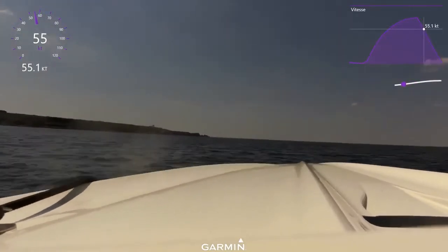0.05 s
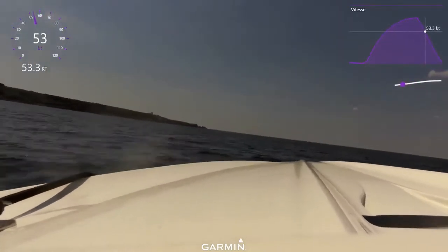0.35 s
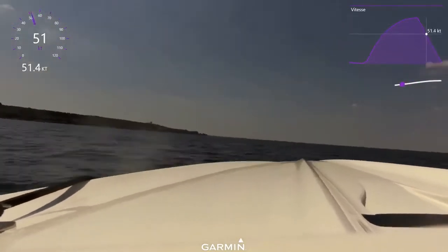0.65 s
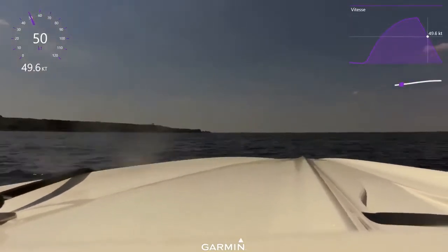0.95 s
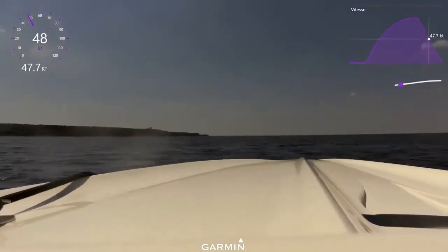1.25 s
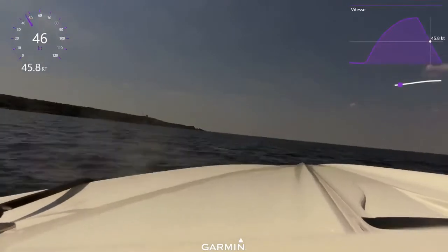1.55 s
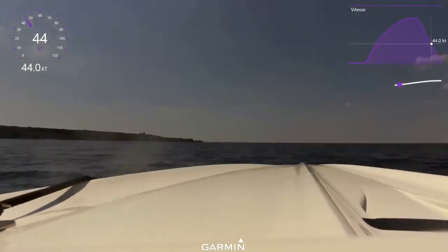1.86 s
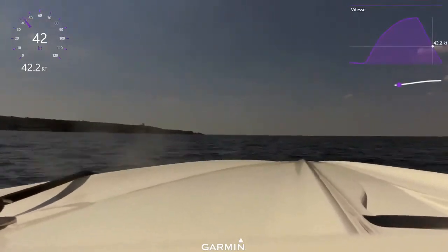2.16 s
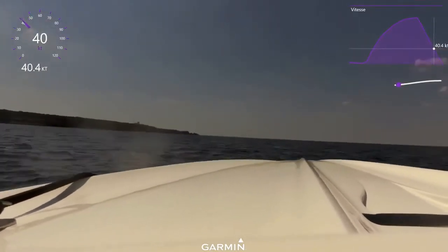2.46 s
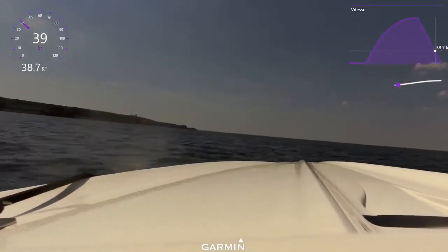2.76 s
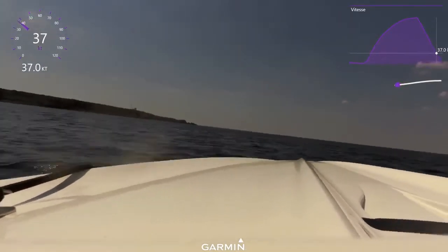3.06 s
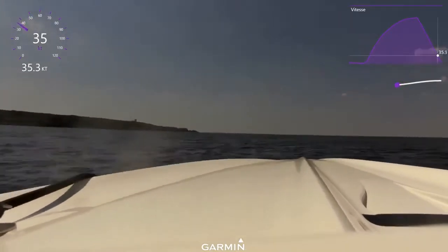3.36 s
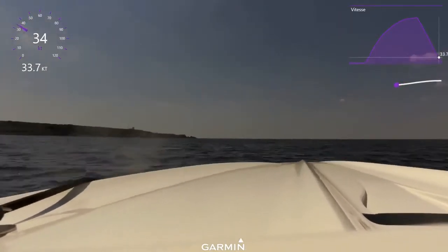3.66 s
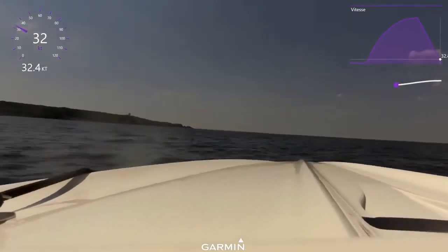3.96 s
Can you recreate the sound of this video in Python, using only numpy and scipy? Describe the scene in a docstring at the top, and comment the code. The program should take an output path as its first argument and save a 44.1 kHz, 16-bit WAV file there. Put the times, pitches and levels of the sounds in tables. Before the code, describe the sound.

Low, gusting wind hits a camera's microphone aboard a speedboat, first with a loud, fast chatter from the mount, then with scattered sharp knocks. Drops tick close by, while water slaps and faintly hisses along the hull.

```python
"""A camera mount chatters and knocks in the headwind, heard from the small camera's own microphone
on the deck of a speedboat slowing from a fast run. For the first second the mount buzzes hard; as the
wind eases this breaks up into single knocks that briefly choke the microphone. Wind roars and buffets
right at the port and spray ticks on the housing. Farther off, water slaps and hisses along the hull,
over a deep rumble."""
import sys
import numpy as np
from scipy import signal
from scipy.fft import rfft, irfft
from scipy.io import wavfile
from scipy.ndimage import uniform_filter1d

SR = 44100
rng = np.random.default_rng(int(sys.argv[2]) if len(sys.argv) > 2 else 0)


def int16_out(signal):
    """Quantize to a 16-bit WAV file."""
    q = np.round(np.clip(np.atleast_2d(signal).T, -1, 1) * 32767)
    wavfile.write(sys.argv[1], SR, q.astype(np.int16))


N = 176400
T = np.arange(N) / SR
KNOCK_MS = 0.74  # width of the pulse from a knock or a drop

# modes of the camera housing: pitch_hz, level_db, t60_ms
HOUSING_MODES = [(2870, 1.5, 7), (3952, 7, 5.4), (4680, 2, 3.26), (1170, -5, 6.4), (8500, -23, 3.0)]


def mount_chatter(rate_hz=99.2, end_s=1.033, jitter_ms=0.33, choke_db=22.5):
    """The mount pushes, sags, rebounds and recovers; returns pressure, scrape envelope and wind gain."""
    # strength of the chatter: time_s, level_db
    strength = [(0, -2), (.3, -2.5), (.6, -1), (.76, -2), (.8, -4), (.86, -3), (.91, -2.5), (.985, -2.5),
                (1.03, -9)]
    # push to rebound, long in a steady blast and short when the chatter sputters: time_s, delay_ms
    rebound_delay = [(0, 1.7), (.12, 2.8), (.145, 1.1), (.2, 2.1), (.55, 2.82), (.72, 2.62), (.96, 2.07),
                     (.985, 1.26), (1.03, 2.5)]
    # scrape after each cycle, relative to its strength: time_s, level_db
    scrape_level = [(0, -22), (.09, -8.5), (.13, -26), (.24, -2.5), (.28, -22), (.39, -19), (.44, -17),
                    (.52, -11.5), (.67, -20), (.78, -14), (.88, -16), (.99, -34), (1.03, 3)]
    # spectrum of the grit in the rebound: frequency_hz, level_db
    grit_colour = [(500, -11.5), (1500, 2), (4000, -3.5), (5500, -13), (8000, -10), (16000, -17.5)]
    push_ms, rebound_ms, release_ms, recover_ms = 0.87, 1, 0.47, 6.6
    bounce_share, rattle_share = 0.37, 0.28
    out, scrape, load = np.zeros((3, N))
    starts = np.arange(.0007, end_s, 1 / rate_hz)
    scatter = np.clip(rng.standard_normal((128, 10)), -1.8, 1.8)
    luck = rng.random((128, 2))
    grit = noise(grit_colour)
    for s, chance, (rattle_luck, bounce_luck) in zip(starts, scatter, luck):
        near, ms = around(s)
        ms = ms - jitter_ms * chance[0]
        gain = undb(curve(strength, s))
        back_ms = max(curve(rebound_delay, s) + 0.53 * chance[1], push_ms)
        free_ms = back_ms + rebound_ms
        push = shove(ms, push_ms, rise_ms=0.12, fall_ms=release_ms)
        sag = undb(-16.5) * shove(ms - push_ms, free_ms - push_ms, release_ms, release_ms)
        rebound = shove(ms - back_ms, rebound_ms, rise_ms=0.53 * np.exp(chance[4] / 2), fall_ms=release_ms)
        swing = push - sag - rebound
        age_ms = np.maximum(ms - free_ms, 0)
        recovery = np.tanh(age_ms / release_ms) * np.exp(-age_ms / recover_ms)
        swing -= recovery * swing.sum() / recovery.sum()  # the swing's pressure sums to zero
        rasp = undb(-19 + 3 * chance[8]) * bump(ms - back_ms, width=2.02) * grit[near]
        bounce = (bounce_luck < bounce_share) * undb(-6) * clack(ms - 6.5 - chance[3] / 2, chance[5])
        rattle = (rattle_luck < rattle_share) * undb(-33) * housing_ring(ms - free_ms, chance[5:])
        out[near] += gain * undb(0.3 * chance[9]) * (swing + rasp + bounce) + rattle
        scrape_gain = gain * undb(curve(scrape_level, s) - 0.5 * chance[2])
        scrape[near] += scrape_gain * bump(ms - 4.62, width=4.3)
        load[near] += gain ** 2 * bump(ms, width=500 / rate_hz)  # chokes the wind for half a cycle
    return cut(out, 20, "high", order=1), scrape, undb(-choke_db * np.minimum(load, 1))


def mount_knocks(choke_db=10, choke_ms=13.4, choke_lag_ms=5.05):
    """Single clacking blows of the mount choke the microphone; returns pressure and wind gain."""
    # knocks: start_s, level_db, rise_ms
    blows = [(1.054, 12, 0.18), (1.0625, -14, 0.62), (1.064, 6.5, 0.22), (1.107, 4.5, 0.84),
             (1.129, 5, 0.19), (1.151, -19, 0.21), (1.16, 7.5, 1), (1.184, 5, 0.21), (1.191, 5, 0.98),
             (1.245, 1, 0.1), (1.262, -1, 0.27), (1.275, 7, 0.2), (1.285, 4.5, 0.072), (1.292, -2, 0.3),
             (1.322, -5, 0.052), (1.339, -6, 0.26), (1.352, -4, 0.067), (1.360, 5.5, 0.14), (1.371, -3, .6),
             (1.503, 5.5, 0.11), (1.528, 5, .6), (1.565, 3, 0.27), (1.570, -2, 0.065), (1.605, 0.5, 0.17),
             (1.631, 0.5, 0.12), (1.664, 1.5, 0.28), (1.689, -1, 0.14), (1.698, 1.5, 0.18),
             (1.811, 3.5, 0.59), (1.919, 1, 0.43), (1.953, 1, 0.17), (1.977, -0.5, 0.099),
             (2.052, -5.5, 0.14), (2.059, -2, 0.34), (2.208, 2.5, .3), (2.475, 4.5, 0.44),
             (2.581, -4, 0.083), (2.601, -4.5, 0.085), (2.739, -1.5, 0.034), (2.845, -9, 0.25),
             (3.011, -5, 0.38), (3.042, 4, 0.59), (3.104, -0.5, 0.098), (3.15, -3.5, 0.019),
             (3.291, 1, 0.48), (3.296, 12, 0.93), (3.301, 2.5, 0.055), (3.331, 7, 0.16), (3.361, -4, 0.28),
             (3.368, 4.5, 0.15), (3.400, 5.5, 0.15), (3.431, 8, 0.85), (3.437, 5, 0.52), (3.473, 6, 0.13),
             (3.504, 0, 0.047), (3.512, 5.5, 0.34), (3.542, 3, 0.11), (3.573, 7.5, 0.42),
             (3.583, -5.5, 0.19), (3.614, 6.5, 0.18), (3.645, -4.5, 0.16), (3.724, 2, 0.18),
             (3.741, -0.5, 1), (3.744, -10, 0.05), (3.961, 2, 0.38)]
    out, load = np.zeros((2, N))
    for (s, db, rise_ms), (direction, pitch) in zip(blows, rng.standard_normal((len(blows), 2))):
        near, ms = around(s)
        pulse = np.sign(direction) * shove(ms, KNOCK_MS, rise_ms)
        out[near] += undb(db) * (pulse + undb(-19) * clack(ms, pitch))
        load[near] = np.maximum(load[near], undb(db) ** 2 * bump(ms - choke_lag_ms, choke_ms))
    return out, undb(-choke_db * np.minimum(load, 1))


def clack(ms, chance, typical_hz=792, detune=0.28):
    """The mount's woody clack: one or two swings, each clack at its own pitch."""
    swings = ms / 1000 * typical_hz * np.exp(detune * chance)
    return np.sin(2 * np.pi * swings) * np.exp(-swings ** 2)


def housing_ring(ms, chances, spread_db=2, contact_ms=0.77):
    """The housing's modes die away after a tap; every tap weights them anew."""
    age_ms = np.maximum(ms, 0)
    modes = 0
    for (hz, db, t60_ms), chance in zip(HOUSING_MODES, chances):
        decay = undb(db + spread_db * chance - 60 * age_ms / t60_ms)
        modes += decay * np.sin(2 * np.pi * hz * age_ms / 1000 + chance)
    return undb(6.5) * modes * (1 - np.exp(-(age_ms / contact_ms) ** 2))


def wind_roar(flicker_db=4):
    """The headwind on the microphone makes a low, flickering roar."""
    # course of the roar: time_s, level_db
    level = [(0, -34), (.7, -27), (.84, -13.5), (.99, -47), (1.04, -17), (1.23, -14), (1.31, -14),
             (1.42, -20.5), (1.8, -19), (2.2, -24), (2.4, -22), (2.55, -19), (2.78, -19.5), (3.0, -18),
             (3.2, -16.5), (3.4, -28), (3.55, -24.5), (3.75, -18), (4, -22)]
    # its spectrum: frequency_hz, level_db
    colour = [(25, -27), (40, -54.5), (70, -4), (115, 2), (250, -2), (380, -3.5), (550, -7), (900, -20),
              (1400, -29), (2400, -47.5), (5000, -86)]
    return noise(colour) * undb(curve(level) + flicker_db * walk(rate_hz=51))


def wind_buffets(scrape, grain_db=6, cracks_per_s=90, stray_db=-44):
    """Bright, grainy turbulence in bursts and in each scrape of the mount; returns rush and cracks."""
    # buffets: middle_s, length_s, relative_db
    bursts = [(0.407, 0.058, -18.5), (0.532, 0.024, -18), (0.814, 0.034, -15), (1.162, 0.017, -10),
              (1.19, 0.015, -5.5), (1.273, 0.076, -11.5), (1.303, 0.057, -8), (1.361, 0.044, -12.5),
              (1.532, 0.017, -11), (1.812, 0.027, -15), (1.92, 0.016, -11.5), (1.981, 0.052, -15),
              (2.057, 0.018, -14.5), (2.211, 0.011, -2.5), (2.467, 0.054, -14), (2.524, 0.036, -14),
              (2.591, 0.031, -16), (2.86, 0.081, -21.5), (3.037, 0.057, -18), (3.109, 0.019, -9),
              (3.741, 0.02, -12.5), (3.962, 0.007, -15.5)]
    # spectrum of the turbulence: frequency_hz, level_db
    colour = [(25, -28), (50, -19.5), (120, 6.5), (300, 7.5), (600, 3), (1100, -4.5), (2000, -20.5),
              (3900, -21), (5200, -40.5), (9000, -65.5), (16000, -96.5)]
    swell = sum(undb(db) * bump(T - s, length_s) for s, length_s, db in bursts)
    turbulence = noise(colour) * undb(grain_db * np.minimum(walk(rate_hz=430), 1.5))
    rush = turbulence * (undb(-6) * swell + scrape)
    # sharp cracks inside the buffets, faint strays in between
    cracks = np.zeros(N)
    scatter = rng.standard_normal((1024, 3))
    for k, (offset, size, pitch) in enumerate(scatter[:int(cracks_per_s * N / SR)]):
        s = np.clip((k + offset / 2) / cracks_per_s, 0, T[-1])
        near, ms = around(s)
        gain = (swell[int(s * SR)] + undb(stray_db)) * undb(5.5 + 3.5 * size)
        pulse = (-1) ** k * shove(ms, length_ms=0.68, rise_ms=0.17)
        cracks[near] += gain * (pulse + undb(-10.5) * clack(ms, pitch))
    return rush, cracks


def spray(lead_ms=0.619, detune=0.075):
    """Drops thump the housing and ring its modes, then burst with a snap lead_ms later."""
    # drops: burst_s, tick_db, thump_db
    drops = [(.024, -21.5, 11.5), (0.055, -14, 1), (.815, -13, 1), (0.851, -13.5, 4.5), (1.033, -27, -8),
             (1.091, -12.5, -1.5), (1.226, -17.5, -6), (1.273, -20.5, -22), (1.296, -16, 1),
             (1.305, -17, 3), (1.314, -15, -14), (1.408, -10.5, 1), (1.447, -19, 1.5), (1.473, -15.5, 1),
             (1.53, -15.5, -9.5), (1.598, -17.5, -10), (1.668, -17.5, -5), (1.727, -14, 0.5),
             (1.791, -16.5, -5.5), (1.853, -12, -2), (1.967, -25.5, 2), (2.108, -18, -1.5),
             (2.144, -13, 3.5), (2.172, -10.5, 0.5), (2.18, -20, -40), (2.239, -22, -1), (2.316, -26.5, 0),
             (2.381, -17.5, -11.5), (2.452, -17, -3), (2.529, -21, -9), (3.222, -11.5, -2.5),
             (3.265, -13.5, 7.5), (3.338, -22, 3.5), (3.572, -15.5, -11), (3.794, -11, 0.5),
             (3.866, -10.5, -1.5)]
    fizz = cut(rng.standard_normal(N), 1200, "high", order=2)
    fizz = cut(fizz, 3800, "low", order=2)
    out = np.zeros(N)
    scatter = rng.standard_normal((len(drops), len(HOUSING_MODES)))
    for (s, tick_db, thump_db), chance in zip(drops, scatter):
        near, ms = around(s)
        thump = shove(ms + lead_ms, KNOCK_MS, rise_ms=0.24) + undb(-9) * clack(ms, chance[0])
        snap = undb(-6.5) * bump(ms, width=1.66) * fizz[near]
        ring = housing_ring((ms + lead_ms) * np.exp(detune * chance[-1]), chance)
        out[near] += undb(tick_db) * (snap + ring) + undb(thump_db) * thump
    return out


def hull_slaps():
    """Water slaps the hull; each slap swells and dies within a few swings."""
    # from deep thumps to hollow pocks: middle_s, pitch_hz, level_db, length_ms
    slaps = [(.514, 836, -10, 2.6), (.816, 980, -10.5, 4.8), (1.29, 288, -1.5, 11.3), (1.921, 703, -3, 3.4),
             (2.21, 600, -13, 7.6), (2.582, 159, -3.5, 7), (3.298, 135, -8, 12), (3.505, 147, -4.5, 11),
             (3.578, 135, -13, 26), (3.741, 160, -8, 7.6)]
    out = np.zeros(N)
    for (s, hz, db, length_ms), phase in zip(slaps, rng.random(len(slaps))):
        near, ms = around(s)
        swell = undb(db) * np.exp(-(2 * ms / length_ms) ** 2)
        out[near] += swell * np.sin(2 * np.pi * (hz * ms / 1000 + phase))
    return out


def hull_hiss(flicker_db=2.6):
    """Water runs along the hull with a faint, flickering hiss."""
    # course of the hiss: time_s, level_db
    level = [(0, -56.5), (.8, -59), (1.1, -48), (1.4, -53.5), (1.9, -54.5), (2.5, -54), (3.0, -52),
             (3.5, -57.5), (4, -56)]
    # its spectrum: frequency_hz, level_db
    colour = [(800, -5), (1600, -11), (2600, -1), (4150, 2), (4700, -12.5), (5600, -13.5), (7000, -37.5),
              (16000, -65)]
    return noise(colour) * undb(curve(level) + flicker_db * walk(rate_hz=60))


def deep_rumble():
    """A rumble near 60 Hz swells and fades under everything."""
    # course of the rumble: time_s, level_db
    level = [(0, -37), (1.0, -51.5), (1.4, -54), (1.56, -27), (1.85, -44), (2.5, -35.5), (2.9, -37),
             (3.22, -37), (3.3, -31), (3.47, -18), (3.55, -50), (4, -41)]
    # its spectrum: frequency_hz, level_db
    colour = [(18, -8.5), (38, -3), (60, 13.5), (110, -23.5), (400, -70), (2000, -130)]
    return noise(colour) * undb(curve(level))


def shove(ms, length_ms, rise_ms, fall_ms=1):
    """Pressure pulse with a rounded front and back."""
    return (np.tanh(2 * ms / rise_ms) - np.tanh(2 * (ms - length_ms) / fall_ms)) / 2


def bump(t, width):
    """Rounded swell of height 1, centred on zero; width is in the unit of t."""
    return np.exp(-(2 * t / width) ** 4)


def around(s):
    """The samples within 30 ms of a moment, and their offset from it in ms."""
    near = slice(max(int((s - .03) * SR), 0), int((s + .03) * SR))
    return near, (T[near] - s) * 1000


def noise(colour):
    """Noise of rms 1 with a (frequency_hz, level_db) spectrum."""
    hz, db = np.array(colour, float).T
    bins_hz = np.arange(N // 2 + 1) * SR / N
    gain = undb(np.interp(np.log(bins_hz + 1), np.log(hz), db))
    x = irfft(rfft(rng.standard_normal(N)) * gain, N)
    return x / x.std()


def walk(rate_hz):
    """Smooth random drift of spread 1 that changes about rate_hz times a second."""
    x = rng.standard_normal(N)
    for _ in range(2):
        x = uniform_filter1d(x, int(SR / rate_hz), mode="wrap")
    return x / x.std()


def curve(points, at=T):
    """Straight lines between (time_s, value) points."""
    return np.interp(at, *np.array(points, float).T)


def cut(x, hz, kind, order):
    """Butterworth high-pass or low-pass."""
    return signal.sosfilt(signal.butter(order, hz, kind, fs=SR, output="sos"), x)


def undb(db):
    """Decibels to gain."""
    return 10 ** (np.asarray(db) / 20)


def scene(port_hz=4540, leak_db=-30.5):
    """Blows reach the microphone through its port, which dulls them and drains the single ones' bass."""
    wash = wind_roar() + hull_hiss()
    rumble = deep_rumble()
    buzz, scrape, buzz_duck = mount_chatter()
    gusts, cracks = wind_buffets(scrape)
    knocks, knock_duck = mount_knocks()
    singles = knocks + cracks + spray() + hull_slaps()
    singles = cut(singles, 110, "high", order=1)
    hits = buzz + cut(singles, 84, "high", order=2)
    dulled = cut(hits, port_hz, "low", order=4) + undb(leak_db) * hits  # some treble leaks past the port
    choked = (wash * buzz_duck + gusts) * knock_duck
    return (dulled + choked + rumble)[None]


def record(dry, ceiling=.74, bottom_hz=40, top_hz=16500):
    """The overloaded recorder rounds the peaks and cuts the deepest bass and the top."""
    rounded = ceiling * np.tanh(dry / ceiling)
    thinned = cut(rounded, bottom_hz, "high", order=2)
    return signal.sosfilt(signal.ellip(8, .2, 70, top_hz, fs=SR, output="sos"), thinned)


dry = scene()
out = record(dry)
int16_out(out)
```